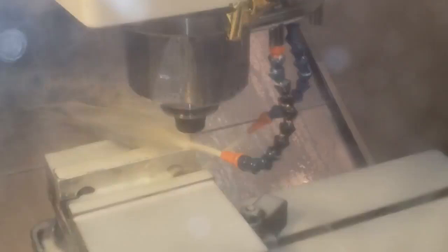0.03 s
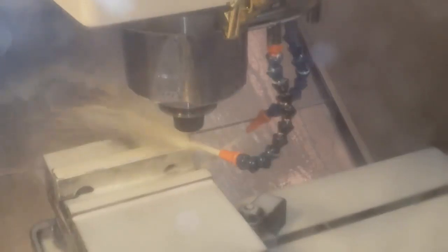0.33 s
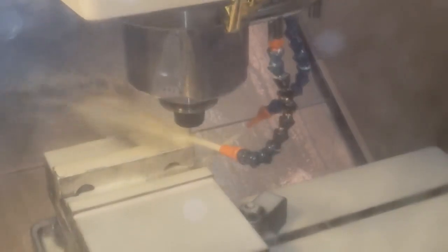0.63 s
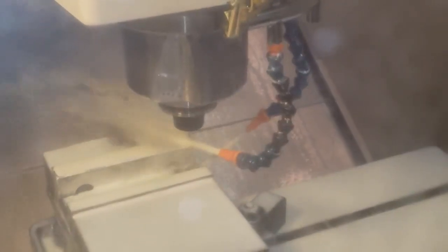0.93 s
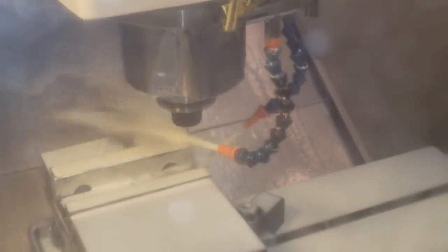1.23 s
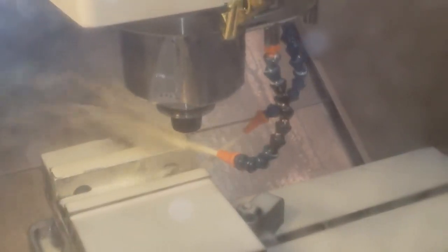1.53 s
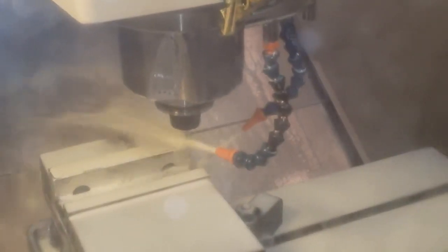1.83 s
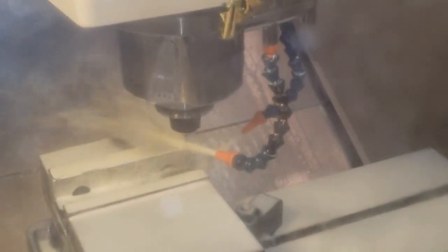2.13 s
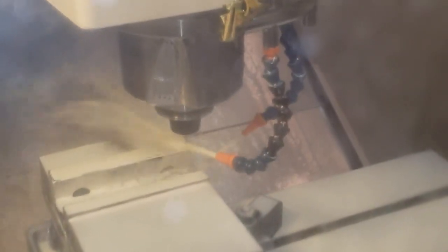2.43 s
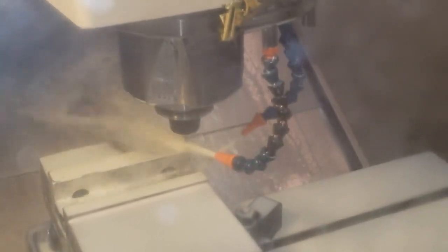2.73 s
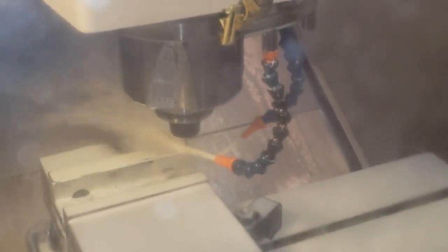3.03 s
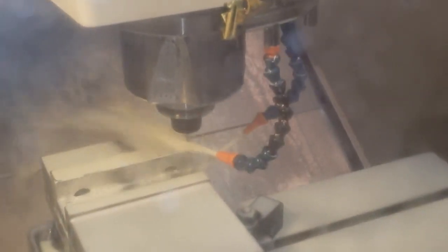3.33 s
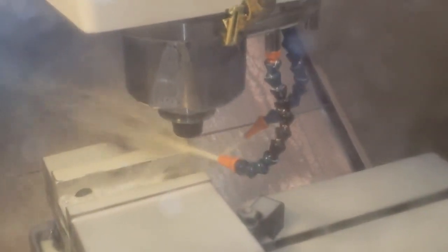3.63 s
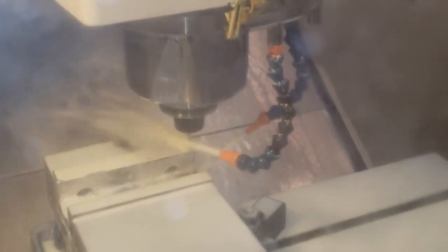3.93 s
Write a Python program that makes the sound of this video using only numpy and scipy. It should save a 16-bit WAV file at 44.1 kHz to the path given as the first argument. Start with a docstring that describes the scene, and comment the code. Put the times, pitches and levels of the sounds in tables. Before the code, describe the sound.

A milling machine hums loudly and steadily while coolant hisses from a nozzle.

```python
"""A loud motor hum cuts in, and with it, all at once, the rest of a milling machine in its enclosure.
The cabinet rumbles underneath; the spindle and the coolant pump each sound a stack of steady tones,
with faint bearing overtones and the whine of drives and fans around them. A nozzle sprays coolant
over the work: the jet hisses and the spray spatters, a little brighter after the first moments.
A whine near 3.2 kHz swells and sinks; the pump's high whine slowly fades, then recovers."""
import sys
import numpy as np
from scipy import signal
from scipy.fft import rfft, irfft
from scipy.io import wavfile

SR = 44100
rng = np.random.default_rng(int(sys.argv[2]) if len(sys.argv) > 2 else 0)


def wrap_up_sound(samples):
    """Save the sound to the file named by the first command line argument, as 16-bit audio."""
    columns = np.atleast_2d(samples).T
    # keep every value between -1 and 1, then stretch to whole-number steps
    tamed = np.clip(columns, -1, 1)
    steps = np.round(tamed * 32767).astype(np.int16)
    wavfile.write(sys.argv[1], SR, steps)


N = 176400

START_S, ATTACK_S, HIGH_CUT_HZ = .068, .002, 15750
HUM_HZ, HUM_DB, HUM_LAG_S = 122.5, -25.05, .00023
SPINDLE_HZ, PUMP_HZ = 36.16, 118.037
SPINDLE_TRIM_DB, PUMP_TRIM_DB, DRIVE_TRIM_DB = .12, .2, -.3
BEARING_SCATTER_DB, BEARING_WAVER_RAD = 5.5, 1.2
JET_FLUTTER_DB, JET_PULSE_DEPTH, SPRAY_FLUTTER_DB, SPATTER_DB = .53, .1, .5, 1.1
ECHO_GAIN, ECHO_T60_S, RIPPLE_ABOVE_HZ = .45, .09, 840

# rumble of the cabinet (frequency [Hz], density [dB per Hz])
RUMBLE_SPECTRUM = [(20, -83), (30, -70), (42, -59), (90, -60.5), (130, -55), (175, -65.5), (240, -61.5),
                   (320, -67.5), (420, -71), (850, -71), (1060, -72), (1170, -72), (1400, -84.5),
                   (2500, -80)]
# spindle tones (multiple of the turning rate, level before trim [dB], pan left [dB], width [0-1])
SPINDLE_TONES = [(2, -44.0, -6, 0.54), (6, -52.8, -1, 0.01), (7, -55.5, 5, 0.04), (8, -55.6, 4, 0.02),
                 (9, -45.8, 5, 0.08), (10, -52.8, -6, 0.04), (14, -49.4, 2, 0.18), (15, -48.4, 1, 0.16),
                 (17, -54.3, 14, 0.31), (18, -46.6, -4, 0.01), (20, -55.1, -5, 0.26), (21, -52.0, 6, 0.15),
                 (23, -45.4, 8, 0.2), (26, -49.4, 3, 0.67), (27, -55.5, -3, 0.22), (28, -50.2, 14, 0.21),
                 (31, -51.7, 14, 0.81), (32, -47.7, 14, 0.32)]
# typical level of the bearing overtones (frequency [Hz], level [dB])
BEARING_LEVELS = [(1200, -59), (1550, -70), (2400, -62.5), (3300, -65), (4400, -66.5), (5400, -63.5),
                  (6900, -64.5), (8400, -81)]
# pump tones (multiple of the stroke rate, level before trim [dB], pan left [dB], width [0-1])
PUMP_TONES = [(3, -54.1, 6, 0.28), (7, -51.6, 14, 0.12), (8, -54.9, 2, 0.4), (10, -54.3, 14, 0.83),
              (14, -53.3, 3, 0.2), (15, -56.6, 1, 0.85), (17, -52.6, -2, 0.02), (19, -55.8, 7, 0.15),
              (20, -55.8, 6, 0.58), (21, -53.7, 2, 0.13), (22, -53.7, 5, 0.89), (24, -52.0, 1, 0.69),
              (25, -56.0, 3, 0.7), (26, -48.1, 1, 0.6), (27, -48.9, 3, 0.32), (28, -49.2, -13, 0.98),
              (31, -57.6, -9, 0.44), (34, -52.1, 6, 0.2), (36, -51.0, -7, 0.57), (38, -52.0, -9, 0.09),
              (39, -56.6, 1, 0.4), (40, -45.5, -9, 0.2), (41, -53.8, -6, 0.77), (44, -51.2, -5, 0.39),
              (46, -48.1, -2, 0.78), (47, -54.7, -1, 0.04), (56, -48.8, -2, 0.52), (57, -53.6, 14, 0.41)]
# tones of drives and fans (frequency [Hz], level before trim [dB], pan left [dB], width [0-1])
DRIVE_TONES = [(43.4, -47.7, 2, 0.0), (53.1, -48.0, 4, 0.01), (62.5, -50.1, 5, 0.04),
               (83.9, -49.5, 1, 0.05), (91.1, -44.8, 2, 0.0), (108.4, -51.8, -5, 0.11),
               (194.9, -51.9, 2, 0.05), (210.7, -51.7, 0, 0.01), (240.0, -53.4, 1, 0.07),
               (245.1, -48.3, 3, 0.02), (250.5, -48.1, 1, 0.06), (272, -54.5, 2, 0.05),
               (543.8, -49.3, 2, 0.12), (815.7, -51.3, 14, 0.49), (980.5, -56.1, 9, 0.21),
               (1772, -56.6, 1, 0.86), (1843.6, -57.1, 5, 0.9), (2598, -55.0, 6, 0.89),
               (4951.7, -50.0, 8, 0.92), (5549.1, -56.0, -1, 0.02), (5619.8, -55.1, -6, 0.7),
               (7626.6, -57.4, 5, 0.01)]
# rush of the jet, with peaks near 2.4, 3.2, 5.4 and 6.7 kHz (frequency [Hz], density [dB per Hz])
JET_SPECTRUM = [(900, -89), (1600, -80), (2000, -76), (2400, -73), (2980, -75.5), (3220, -71.5),
                (3500, -75.5), (4520, -74), (4740, -75), (4980, -75.5), (5400, -70.5), (5850, -78.5),
                (6700, -73.5), (7550, -78), (8100, -83.5), (10000, -99)]
# fine spray striking the work (frequency [Hz], density [dB per Hz])
SPRAY_SPECTRUM = [(5000, -80.5), (8000, -84), (9200, -86.5), (10100, -79.5), (10700, -81), (11600, -76),
                  (12700, -75.5), (14600, -78), (15700, -78)]
# surges of the spray, played about their median (time [s], level [dB])
SPRAY_RIDE = [(.2, -40.2), (.4, -39.5), (.57, -40.6), (.7, -39.9), (.74, -37.6), (1.18, -37.6),
              (1.6, -38.2), (2.7, -37.9), (3.9, -38.3)]
# swells of the whine near 3.2 kHz, played about their median (time [s], level [dB])
LOW_WHINE_RIDE = [(.3, -44), (.55, -42), (.73, -44.3), (1, -42.6), (1.18, -45), (1.85, -43.9),
                  (2.24, -42.7), (2.33, -44.8), (2.7, -43), (2.92, -44.2), (3.08, -42), (3.38, -42.4),
                  (3.54, -44.3), (3.69, -41.5), (3.84, -43.9)]
# the pump's whine near 4.7 kHz slowly fades, then recovers; about its median (time [s], level [dB])
PUMP_WHINE_RIDE = [(.1, -47), (.85, -45.6), (2.8, -47.7), (3.37, -49.8), (3.9, -46.5)]
# how alike the noise is left and right (frequency [Hz], correlation [-1 to 1])
STEREO_LIKENESS = [(50, .88), (150, .9), (300, .75), (600, .55), (1100, -.1), (2500, .1), (5000, .05),
                   (7000, .2), (8500, .5), (10500, .66), (14000, .66)]
# where the noise and the bearings sit (frequency [Hz], pan left [dB])
STEREO_BALANCE = [(40, 5), (130, 2), (400, 2), (650, 3.5), (1150, 4), (2200, 2), (3300, 0.5), (4500, -2),
                  (6500, 1.5), (9500, 0), (12500, -2)]


def undb(db):
    """Decibels to gain."""
    return 10 ** (np.asarray(db) / 20)


def at(points, hz):
    """Read (Hz, value) points on a log-frequency axis."""
    freqs, values = np.array(points, float).T
    return np.interp(np.log(np.maximum(hz, 1)), np.log(freqs), values)


def walk(rate_hz):
    """Smooth random modulation with a spread near 1."""
    position = np.arange(N) / SR * rate_hz
    step = position.astype(int)
    targets, blend = rng.standard_normal(step[-1] + 2), position - step
    return targets[step] + np.diff(targets)[step] * blend ** 2 * (3 - 2 * blend)


def ride(curve):
    """Fader gain along a (s, dB) curve, with unity at its median."""
    db = np.interp(np.arange(N) / SR, *np.array(curve, float).T)
    return undb(db - np.median(db))


def turning(hz, drift):
    """Angle of a shaft whose speed wanders by the fraction drift."""
    return 2 * np.pi * hz * np.cumsum(1 + drift * walk(6)) / SR


def tone(angle, db, pan_db, width, flutter_db):
    """One fluttering partial; reflections put left and right out of step (width 1 = opposed)."""
    start, way = rng.uniform(0, 2 * np.pi), rng.choice([-1, 1])
    spread = way * width * np.pi / 2 * np.array([[1], [-1]])
    sides = undb([pan_db / 2, -pan_db / 2])
    sides = 2 * sides / np.hypot(*sides)
    return sides[:, None] * undb(db + flutter_db * walk(6.96)) * np.sin(angle + start + spread)


def enclosure():
    """Response of the close walls: dense, short echoes that ripple the spectrum."""
    echoes = rng.standard_normal(N) * undb(-60 * np.arange(N) / SR / ECHO_T60_S)
    return np.sqrt(1 - ECHO_GAIN ** 2) + ECHO_GAIN * rfft(echoes / np.linalg.norm(echoes))


def noise(spectrum):
    """Stereo noise bed coloured by the enclosure, rolling off beyond the ends of its spectrum."""
    hz = np.maximum(np.fft.rfftfreq(N, 1 / SR), 1)
    rolloff = np.minimum(hz / spectrum[0][0], 1) ** 2 * np.minimum(spectrum[-1][0] / hz, 1) ** 2
    likeness, sign = at(STEREO_LIKENESS, hz), np.array([[1], [-1]])
    mid, side = rfft(rng.standard_normal((2, N)))
    mid *= np.where(hz > RIPPLE_ABOVE_HZ, enclosure(), 1) * np.sqrt(1 + likeness)
    side *= np.where(hz > RIPPLE_ABOVE_HZ, enclosure(), 1) * np.sqrt(1 - likeness)
    colour = rolloff * undb(at(spectrum, hz) + sign * at(STEREO_BALANCE, hz) / 2)
    return irfft((mid + sign * side) * colour, N) * np.sqrt(SR) / 2


def motor():
    """The loud, nearly pure hum, reaching the right side first."""
    lead = np.pi * HUM_HZ * HUM_LAG_S * np.array([[-1], [1]])
    return tone(turning(HUM_HZ, drift=.00047) + lead, HUM_DB, pan_db=0, width=0, flutter_db=.4)


def cabinet(flutter_db=1.0):
    """The panels rumble unevenly under the hum."""
    return noise(RUMBLE_SPECTRUM) * undb(flutter_db * walk(12))


def spindle(shaft):
    """The spindle drones on strong multiples of its turning rate."""
    return sum(tone(k * shaft, db + SPINDLE_TRIM_DB, pan, width, flutter_db=.33)
               for k, db, pan, width in SPINDLE_TONES)


def bearings(shaft, count=80):
    """The bearings add faint, high multiples of the turning rate, each wavering into the hiss."""
    multiples = rng.choice(np.arange(34, 232), count, replace=False)
    scatter_db = BEARING_SCATTER_DB * np.clip(rng.standard_normal((count, 2)), -2, 1.2)
    shimmer = np.zeros((2, N))
    for k, (level_offset, pan_offset) in zip(multiples, scatter_db):
        angle = k * shaft + BEARING_WAVER_RAD * walk(12)
        db = at(BEARING_LEVELS, k * SPINDLE_HZ) + level_offset
        pan = at(STEREO_BALANCE, k * SPINDLE_HZ) + pan_offset
        shimmer += tone(angle, db, pan, width=rng.random(), flutter_db=2.5)
    return shimmer


def pump(stroke):
    """The pump buzzes on multiples of its stroke rate, far into the treble."""
    return sum(tone(k * stroke, db + PUMP_TRIM_DB, pan, width, flutter_db=1.2)
               for k, db, pan, width in PUMP_TONES)


def drives():
    """Drives and fans hum and whine, each tone wandering on its own."""
    return sum(tone(turning(hz, drift=.0003), db + DRIVE_TRIM_DB, pan, width, flutter_db=1.4)
               for hz, db, pan, width in DRIVE_TONES)


def coolant(stroke):
    """The jet pulses with the pump; its spray spatters and surges as more or less strikes the work."""
    flow = walk(14)
    pulse = 1 + JET_PULSE_DEPTH * np.sin(stroke)
    jet = noise(JET_SPECTRUM) * undb(JET_FLUTTER_DB * flow) * pulse
    spray = noise(SPRAY_SPECTRUM) * ride(SPRAY_RIDE) * undb(SPRAY_FLUTTER_DB * flow)
    spatter = undb(SPATTER_DB * walk(980))
    return jet + spray * spatter


def band_swell(sound, hz, width_hz, curve):
    """One narrow band swells and sinks: a bell EQ with its gain ridden."""
    bell = np.exp(-((np.fft.rfftfreq(N, 1 / SR) - hz) / width_hz) ** 2)
    return sound + irfft(rfft(sound) * bell, N) * (ride(curve) - 1)


def scene():
    """The running machine: hum, rumble and drones below, hiss and two shifting whines on top."""
    shaft, stroke = turning(SPINDLE_HZ, drift=.000302), turning(PUMP_HZ, drift=.0002)
    treble = coolant(stroke) + pump(stroke) + bearings(shaft)
    treble = band_swell(treble, hz=3200, width_hz=220, curve=LOW_WHINE_RIDE)
    treble = band_swell(treble, hz=4722, width_hz=120, curve=PUMP_WHINE_RIDE)  # pump partial 40
    return motor() + cabinet() + spindle(shaft) + drives() + treble


def record(dry):
    """The mix snaps open and passes through a steep high cut."""
    gate = np.clip((np.arange(N) / SR - START_S) / ATTACK_S, 0, 1)
    high_cut = signal.ellip(12, .1, 80, HIGH_CUT_HZ, fs=SR, output="sos")
    return signal.sosfilt(high_cut, dry * gate)


dry = scene()
out = record(dry)
wrap_up_sound(out)
```